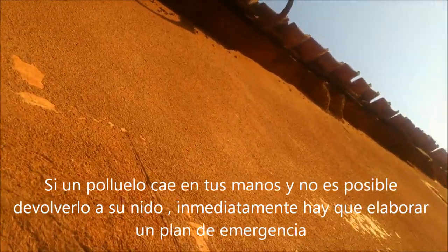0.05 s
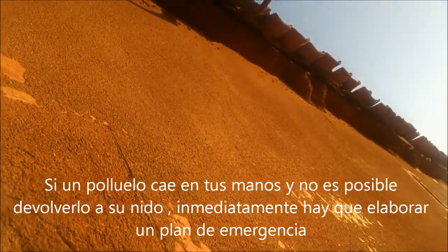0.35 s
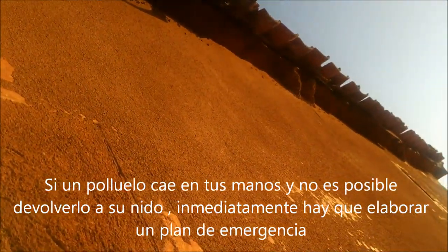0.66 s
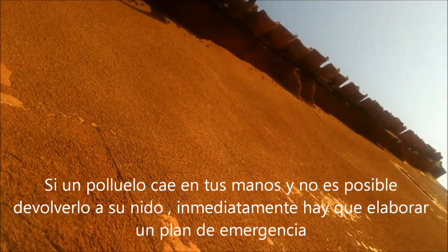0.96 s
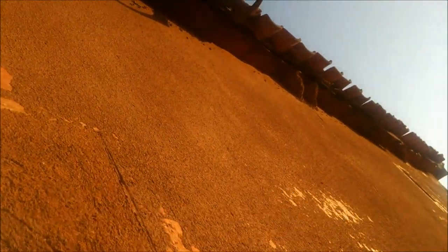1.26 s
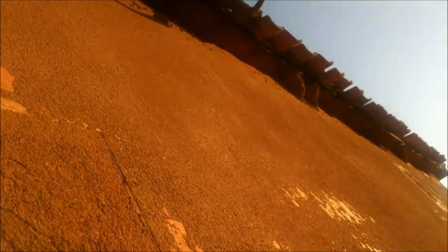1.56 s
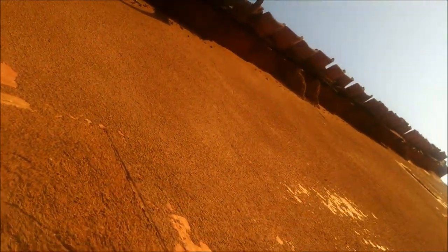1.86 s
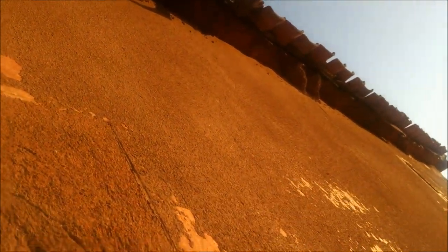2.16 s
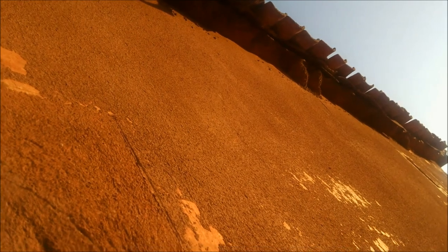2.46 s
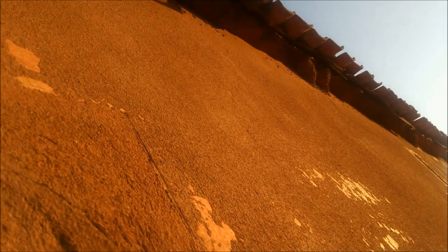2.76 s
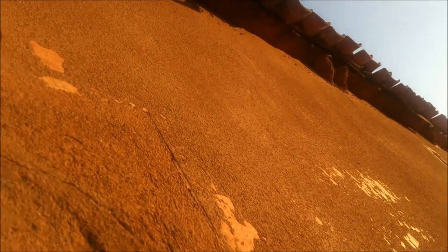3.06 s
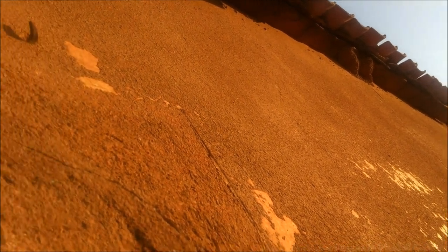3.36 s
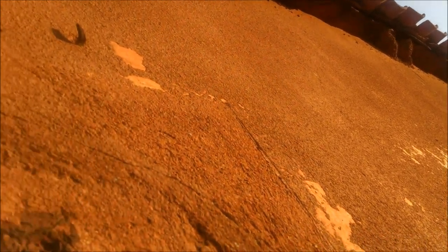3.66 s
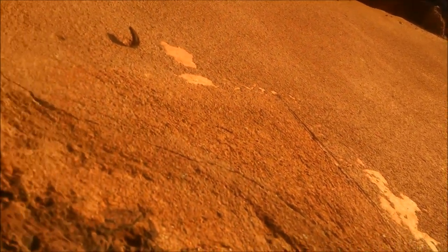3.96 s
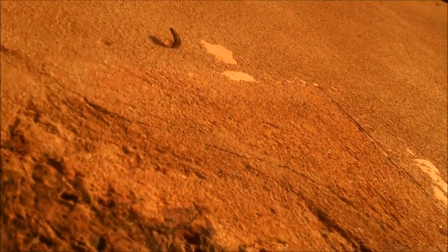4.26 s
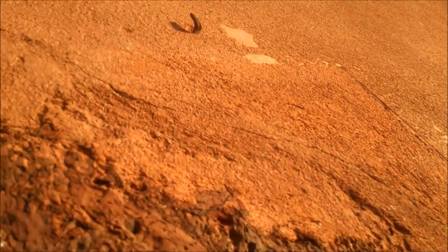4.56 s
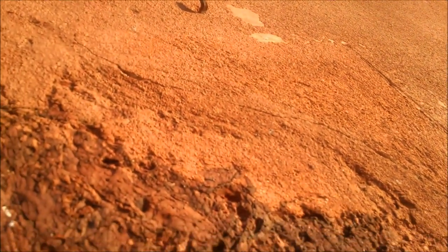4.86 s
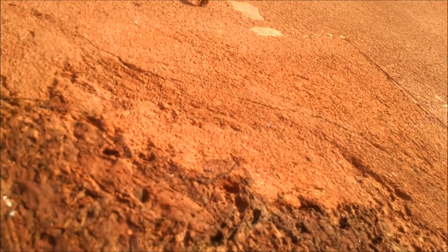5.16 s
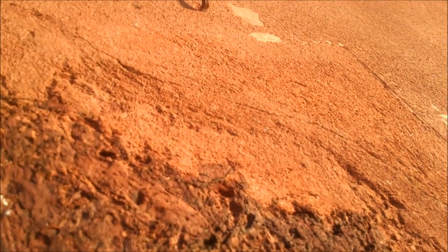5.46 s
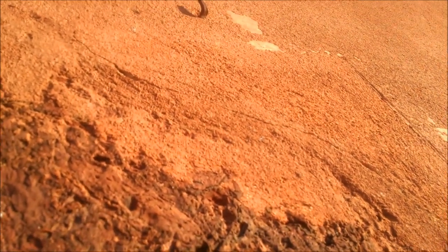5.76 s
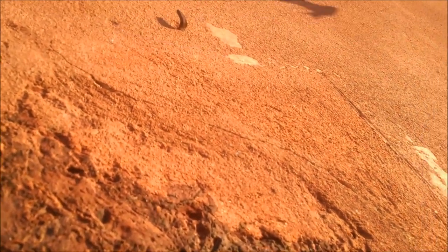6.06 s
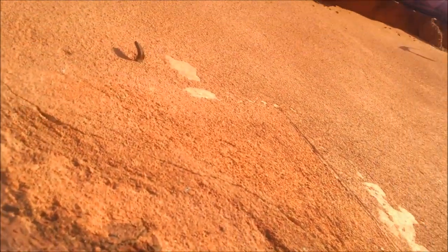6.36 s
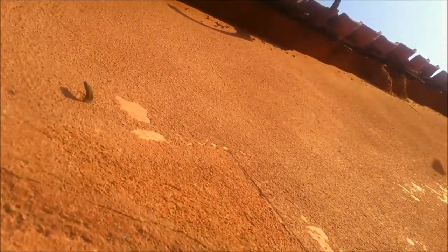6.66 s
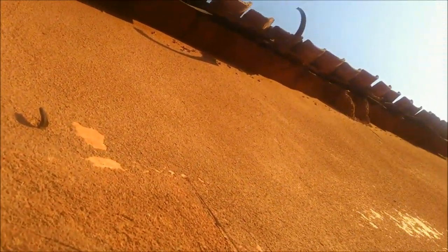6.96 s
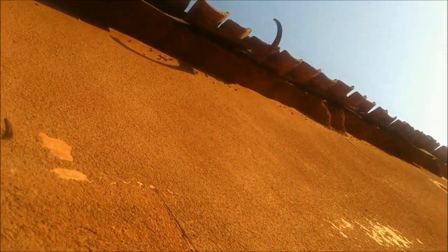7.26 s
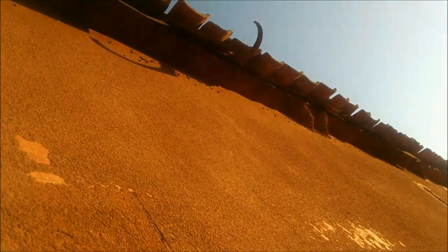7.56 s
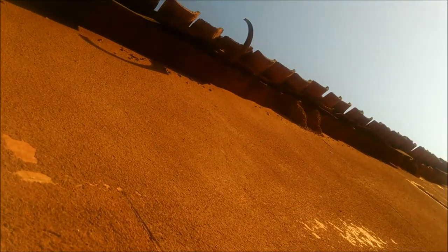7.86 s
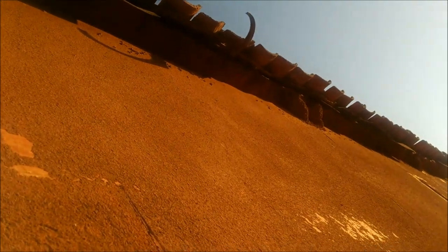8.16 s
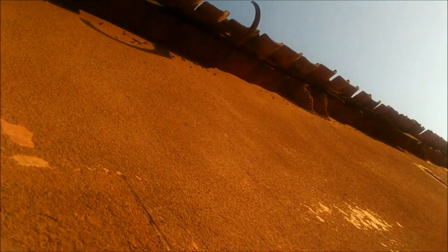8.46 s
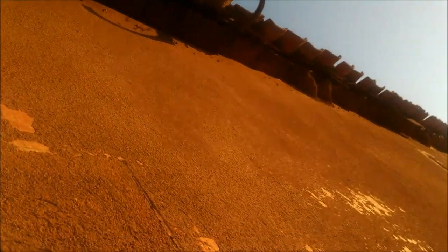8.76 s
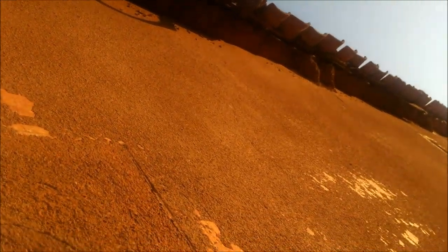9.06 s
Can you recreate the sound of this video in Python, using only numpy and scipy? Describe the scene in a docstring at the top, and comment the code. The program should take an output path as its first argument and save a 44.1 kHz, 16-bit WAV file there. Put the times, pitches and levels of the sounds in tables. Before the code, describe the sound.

Small birds chatter outdoors, close to the microphone at a nest under house eaves. Quick, high two-part chirps open the first half second, followed by short whistles and ticks, while other birds twitter and answer from down an echoing street over a faint low rumble of air. From about 2.3 to 3.5 seconds a far motor, barely audible, whines upward. A dry nasal stutter comes at 3 seconds, then rasping churrs from 3.5 to 4.8 and quick trills around 5. From about 5.4 seconds a busy warble of nasal notes and sharp ticks runs on, with louder answers from the street. At 7.5 seconds the chatter cuts off abruptly. A much quieter place remains until the end, just after 9 seconds, with soft still air and a few faint, blurred chirps in the distance, slightly to the left.

```python
"""Under the eaves of a plastered house wall, the microphone close to a nest of house martins. Each bird's
syrinx glides and shakes in pitch, its throat picking the overtones: two-part chirps, a stutter, rasping churrs,
trills and a warble with ticks. Others answer from down the echoing street, where a far motor whines upward.
Then the scene changes abruptly to a much quieter place with a few distant chirps."""
import sys
import numpy as np
from scipy import signal
from scipy.fft import rfft, irfft, next_fast_len
from scipy.io import wavfile
from scipy.ndimage import uniform_filter1d, minimum_filter1d

SR = 44100
rng = np.random.default_rng(int(sys.argv[2]) if len(sys.argv) > 2 else 0)


def dump(signal):
    """Clip the signal to [-1, 1] and save it as 16-bit WAV at the path in sys.argv[1]."""
    limited = np.clip(np.atleast_2d(signal).T, -1, 1)
    pcm = np.round(limited * 32767).astype(np.int16)
    wavfile.write(sys.argv[1], SR, pcm)


N = 411453
TIME = np.arange(N) / SR
CHATTER_END_S, TOP_HZ = 7.475, 15500

# Ways a note can bend. Each entry: a name, then four pitches from start to end as shares of its pitch.
BENDS = {"arch": (.66, .93, 0.98, .72), "sweep": (0.51, .93, 0.99, 0.96), "rise": (.86, .92, 1.06, 1.22),
         "dip": (1.5, .96, .95, 1.3), "fall": (1.1, 1.06, .93, .82), "level": (.96, 1.01, 1.0, .99)}
# Faint hiss behind both places. Each row: frequency in Hz, relative level in dB.
HISS_SPECTRUM = [(900, 1), (3000, 2.5), (7000, -2), (12500, -0.5), (15500, -10.5)]


def close_birds():
    """All the calls from the nest; so small a bird radiates little that is low."""
    calls = chirp_pairs() + churrs() + trills() + stutter() + warble()
    return signal.sosfilt(signal.butter(4, 1150, "high", fs=SR, output="sos"), calls)


def chirp_pairs():
    """A rough arch is answered at once by a slightly louder, purer upsweep."""
    # Each row: start, delay of the upsweep and syllable length in seconds, relative level in dB.
    pairs = [(0.055, .023, .018, -17.5), (0.143, 0.027, .014, -15), (0.228, 0.025, .014, -13),
             (0.39, 0.023, 0.011, -9), (1.836, .021, .012, -17.5), (3.403, 0.025, .02, -14.5)]
    arch_hz, sweep_hz = (2507, 2890, 3720, 4643, 2900), (2720, 4280, 4850, 4900, 4530)
    out = np.zeros(N)
    for s, gap, length, db in pairs:
        arch = harsh_syllable(length, arch_hz, overtone_db=-6, rasp=.93, flutter_hz=290)
        sweep = harsh_syllable(length, sweep_hz, overtone_db=-12.5, rasp=.58, flutter_hz=310)
        add(out, s, from_db(db) * arch)
        add(out, s + gap, from_db(db + 1) * sweep)
    return out


def churrs(flick_s=.008):
    """A growl, then syllables that dwell low and end in a high flick; flicks grow as the lows fade."""
    # Each row: start and growl length in seconds, syllables, period in seconds, relative level in dB.
    calls = [(3.520, .023, 3, 0.029, -12.5), (3.710, 0.03, 4, 0.023, -15), (3.877, 0.045, 3, .026, -15.5),
             (4.087, 0.032, 1, 0.035, -16), (4.403, 0.04, 3, 0.026, -15), (4.578, 0.027, 3, .026, -15),
             (4.76, 0.013, 2, .023, -23.5)]
    growl_hz, body_hz, flick_hz = (2650, 2790, 2570), (2570, 2646, 3100), (3700, 5040, 5500)
    out = np.zeros(N)
    for s, growl_s, syllables, period, db in calls:
        growl = harsh_syllable(growl_s, growl_hz, overtone_db=-6.5, rasp=1, flutter_hz=233)
        add(out, s, from_db(db - 5) * growl)
        body_s = .72 * period - flick_s / 2
        for k, along in enumerate(np.linspace(0, 1, syllables)):
            start = s + growl_s + k * period
            arched_db = db - 2 * (2 * along - 1) ** 2
            body = harsh_syllable(body_s, body_hz, overtone_db=-3, rasp=.94, flutter_hz=190)
            flick = harsh_syllable(flick_s, flick_hz, overtone_db=-11.5, rasp=.92, flutter_hz=240)
            add(out, start, from_db(arched_db - 6 * along ** 2) * body)
            add(out, start + body_s - flick_s / 2, from_db(arched_db - 6 + 7 * along) * flick)
    return out


def trills(hook_s=.015, sweep_s=.0105, fade_db=-1.4):
    """One hooked syllable, then cleaner upsweeps that end on an even beat and fade one after another."""
    # Each row: start in seconds, syllables, period in seconds, relative level in dB.
    calls = [(4.917, 5, 0.021, -14.5), (5.091, 5, .022, -11), (5.33, 4, .023, -22.5)]
    hook_hz, sweep_hz = (2484, 2490, 3640, 4800), (2600, 4830, 5095, 5580)
    out = np.zeros(N)
    for s, syllables, period, db in calls:
        hook = harsh_syllable(hook_s, hook_hz, overtone_db=-3, rasp=1, flutter_hz=280)
        add(out, s, from_db(db - 2) * hook)
        for k in range(1, syllables):
            sweep = harsh_syllable(sweep_s, sweep_hz, overtone_db=-14, rasp=.68, flutter_hz=270)
            add(out, s + hook_s - sweep_s + k * period, from_db(db + k * fade_db) * sweep)
    return out


def stutter(note_s=.0095, grace_s=.008, lead_s=.0115, bend=(1.1, 1.03, .97, .99)):
    """A dry nasal note over and over, each time with a softer grace note before it."""
    # Each row: start in seconds, relative level in dB, pitch in Hz.
    notes = [(2.9695, -18.5, 1444), (3.0110, -15, 1487), (3.0550, -15, 1460), (3.0990, -14, 1530),
             (3.1460, -13.5, 1638), (3.2105, -13, 1532)]
    out = np.zeros(N)
    for s, db, hz in notes:
        pitches = hz * np.array(bend)
        for start, length, level_db in (s - lead_s, grace_s, db - 6), (s, note_s, db):
            note = syllable(length, pitches, overtone_db=-5, rasp=.39, flutter_hz=450,
                            swell=.7, waver=.25)
            add(out, start, from_db(level_db) * note)
    return out


def warble(tick_s=.0037):
    """The running song: bent whistles, nasal notes rich in overtones, and notes clipped to ticks."""
    # Each row: start and length in seconds, relative level in dB, pitch in Hz, bend.
    whistles = [(0.0, .010, -16.5, 4900, "sweep"), (0.1, 0.014, -24, 4600, "level"),
                (0.261, 0.0091, -21.5, 4050, "arch"), (0.283, 0.019, -20, 4220, "arch"),
                (0.304, 0.013, -23, 3420, "arch"), (0.504, 0.013, -15.5, 3930, "dip"),
                (0.7547, 0.029, -22, 2846, "level"), (0.773, 0.025, -28, 2316, "dip"),
                (0.882, 0.011, -25, 3010, "rise"), (0.909, .008, -24, 2790, "fall"),
                (1.123, 0.034, -25, 3150, "rise"), (1.188, .017, -22.5, 3560, "rise"),
                (1.210, 0.0109, -21, 3110, "dip"), (1.945, 0.024, -17.5, 3493, "arch"),
                (2.077, 0.054, -34.5, 2015, "level"), (2.15, 0.01, -14, 3060, "level"),
                (2.193, 0.038, -28.5, 2586, "dip"), (2.252, 0.076, -26.5, 2950, "level"),
                (2.307, 0.072, -25, 3003, "level"), (2.415, 0.052, -24, 3060, "rise"),
                (2.513, 0.032, -23, 2955, "level"), (5.237, 0.0073, -12.5, 3360, "sweep"),
                (5.243, .024, -24, 3770, "level"), (5.620, 0.041, -28, 1513, "dip"),
                (5.67, 0.023, -32.5, 1907, "dip"), (5.73, 0.061, -29.5, 1865, "dip"),
                (5.769, 0.029, -26, 1412, "arch"), (6.033, .03, -27.5, 1460, "dip"),
                (6.075, .031, -28, 1560, "rise"), (6.147, 0.034, -25.5, 1950, "rise"),
                (6.348, 0.026, -28.5, 2050, "fall"), (6.671, 0.04, -31.5, 1980, "arch"),
                (6.807, 0.027, -31.5, 1156, "dip"), (6.858, 0.018, -28, 1294, "dip"),
                (6.956, 0.072, -31, 1115, "dip"), (7.090, 0.06, -19, 2644, "sweep"),
                (7.115, 0.04, -22, 3050, "level"), (7.295, 0.035, -29.5, 1510, "dip"),
                (7.339, 0.017, -22.5, 1943, "dip"), (7.355, 0.018, -25, 2690, "level")]
    # Low whistles are reedy, high ones nearly pure. Each row: pitch in Hz, dB per overtone.
    purity = [(1200, -9), (2000, -15.5), (3000, -22)]
    # Each row: start and length in seconds, relative level in dB, pitch in Hz.
    nasal_notes = [(0.217, 0.017, -26, 1490), (0.355, 0.012, -30, 1620), (0.47, .023, -25, 1700),
                   (0.522, 0.018, -26, 1458), (0.687, .019, -24.5, 1623), (0.844, 0.0036, -20, 1430),
                   (1.111, 0.0062, -25, 2620), (1.831, 0.011, -24, 2170), (2.082, 0.057, -30.5, 1003),
                   (5.489, 0.064, -27, 1366), (5.858, 0.0061, -13, 1725), (6.184, .044, -27, 1030),
                   (6.2755, .008, -18.5, 1783), (6.439, 0.013, -19.5, 1616), (6.605, 0.017, -23, 1607),
                   (6.77, .011, -15.5, 1632), (7.228, 0.0043, -14.5, 1823)]
    # Each row: start in seconds, relative level in dB, pitch in Hz.
    ticks = [(0.9358, -23, 3500), (0.9544, -13, 3720), (1.911, -15.5, 2680), (1.9311, -10.5, 3080),
             (2.173, -11, 2970), (2.4808, -17.5, 2710), (2.497, -10, 3040), (5.4244, -14, 2710),
             (5.445, -8.5, 2720), (5.5514, -14.5, 5170), (5.6, -14.5, 2520), (5.6192, -11, 2670),
             (5.6526, -14.5, 2790), (5.7753, -15, 2760), (5.8375, -15.5, 3570), (5.9621, -13.5, 4060),
             (6.0298, -13, 2780), (6.143, -19, 3490), (6.2597, -13.5, 3710), (6.322, -19, 3880),
             (6.3359, -11, 2630), (6.6174, -20.5, 3000), (6.6516, -15.5, 3320), (6.7505, -12.5, 4670),
             (6.873, -12, 3530), (6.926, -14, 3540), (6.9439, -10.5, 2630), (7.0824, -16, 2150),
             (7.209, -13.5, 3680), (7.2715, -6, 3570), (7.2898, -12.5, 3040), (7.3214, -15.5, 2670)]
    # Pitch from start to end, as shares of the note's pitch.
    nasal_bend = (.92, 1.01, 1.02, .93)
    tick_bend = (0.934, 1.035)
    out = np.zeros(N)
    for s, length, db, hz, bend in whistles:
        rasp = np.interp(length, [.015, .05], [.6, .25])  # brief notes are rough, held ones clear
        pitches = hz * np.array(BENDS[bend])
        whistle = syllable(length, pitches, at_hz(purity, hz), rasp, flutter_hz=219, waver=.06)
        add(out, s, from_db(db + 1) * whistle)
    for s, length, db, hz in nasal_notes:
        note = syllable(length, hz * np.array(nasal_bend), overtone_db=-4.5, rasp=.58,
                        flutter_hz=300, swell=.22, waver=.14)
        add(out, s, from_db(db - .5) * note)
    for s, db, hz in ticks:
        tick = syllable(tick_s, hz * np.array(tick_bend), overtone_db=-17, rasp=.57,
                        flutter_hz=400, swell=.96, waver=.1)
        add(out, s, from_db(db - 1) * tick)
    return out


def harsh_syllable(length, pitches, overtone_db, rasp, flutter_hz):
    """The second side of the syrinx joins higher up; no two syllables have quite the same pitch."""
    pitches = np.array(pitches) * (1 + .03 * rng.standard_normal(len(pitches)))
    first = syllable(length, pitches, overtone_db, rasp, flutter_hz, swell=.39, waver=.09)
    second = syllable(length, np.minimum(1.3 * pitches, 5500), overtone_db, rasp, flutter_hz)
    return first + from_db(-11) * rasp ** 2 * second


def syllable(length, pitches, overtone_db, rasp, flutter_hz, swell=.45, waver=.125):
    """The syrinx glides through a few pitches; in a rasp its pitch and strength shake rapidly."""
    # What throat and beak let through. Each row: frequency in Hz, gain in dB.
    throat = [(900, -45.5), (1500, -13.5), (2100, 2), (2900, 9.5), (5200, 5), (6500, -4.5), (7700, -14),
              (9000, -32.5), (14000, -37)]
    count = int(np.clip(length * SR, 16, 7000))
    along = np.linspace(0, 1, count)
    contour = np.polyfit(np.linspace(0, 1, len(pitches)), pitches, len(pitches) - 1)
    shake = rms_one(band(rng.standard_normal((2, 8000)), flutter_hz / 3, flutter_hz))
    pitch_shake, strength_shake = shake[:, 1000:1000 + count]
    hz = np.maximum(np.polyval(contour, along) * (1 + waver * rasp * np.tanh(pitch_shake)), 800)
    # the voice breaks into uneven beats
    beat_phase = 2 * np.pi * (rng.random() + np.cumsum(flutter_hz * (1 + .5 * strength_shake)) / SR)
    strength = (1 + min(rasp, .65) * np.sin(beat_phase)) * from_db(3 * rasp * strength_shake)
    harmonic = np.arange(1, 8)[:, None]
    weights = from_db(at_hz(throat, harmonic * hz) + (harmonic - 1) * overtone_db)
    weights *= harmonic * hz < TOP_HZ
    weights /= np.sqrt(np.sum(weights ** 2, axis=0)) + 1e-9
    tone = np.sum(weights * np.sin(harmonic * 2 * np.pi * np.cumsum(hz) / SR), axis=0)
    edges = signal.windows.tukey(count, min(90 / count, 1))  # about a millisecond to start and stop
    voice = tone * rms_one(strength) * edges * np.sin(np.pi * along).clip(0) ** swell
    low_cut = signal.butter(4, .8 * min(pitches), "high", fs=SR, output="sos")
    return signal.sosfilt(low_cut, np.pad(voice, (0, 100)))


def far_birds(calls, overtone_db):
    """Calls far from the microphone: distance leaves little more than the fundamental."""
    out = np.zeros(N)
    for s, length, db, rasp, hz, bend in calls:
        call = syllable(length, hz * np.array(BENDS[bend]), overtone_db, rasp, flutter_hz=281.3, waver=.17)
        add(out, s, from_db(db) * call)
    return out


def colony(calls_per_s=40, centre_hz=3350):
    """Many far birds twitter at random, blurred by the street into a wash."""
    # Each row: time in seconds, relative level in dB.
    levels = [(0.0, -30), (1.78, -38), (2.22, -27.5), (3.46, -42.5), (3.71, -32.5), (4.46, -41),
              (5.13, -31.5), (7.2, -32), (7.45, -49)]
    # Each row: frequency in Hz, relative level in dB.
    wash_spectrum = [(900, -37.5), (1300, -15.5), (1900, -6), (2900, -2), (4200, -3.5), (5200, -9),
                     (7000, -21.5), (9000, -49.5)]
    draws = rng.random((int(calls_per_s * CHATTER_END_S), 5))
    calls = []
    for i, (when, length, loud, tune, shape) in enumerate(draws):
        hz = centre_hz * 1.5 ** (tune - .5)
        bend = list(BENDS)[int(shape * len(BENDS))]
        calls.append(((i + when) / calls_per_s, .015 + .05 * length, 5 * loud, .6, hz, bend))
    voices = rms_one(street_echoes(far_birds(calls, overtone_db=-16), t60=.12))
    wash = from_db(-8) * air_noise(wash_spectrum)
    return from_db(-7) * gain_curve(levels) * (.8 * voices + wash)


def street_echoes(x, t60, echoes_per_s=1500, width=.12):
    """Scattered echoes between house fronts, dulled in the treble and dying away over t60 seconds."""
    t = np.arange(SR) / SR
    arrivals = rng.standard_normal((2, SR)) * (rng.random((2, SR)) < echoes_per_s / SR) * (t > .008)
    arrivals *= from_db(-60 * t / t60)
    tails = band(arrivals, 1000, 4800) / np.sqrt(np.sum(arrivals ** 2, axis=1, keepdims=True))
    mid, side = signal.fftconvolve(x[None], tails, axes=1)[:, :N]
    return mid + width * side * [[1], [-1]]


def motor():
    """A far motor speeds up: a faint whine with its octave, ragged at first and steadying as it rises."""
    # Each row: time in seconds, pitch in Hz, levels of fundamental and octave in dB.
    run_up = [(2.33, 520, -64, -68), (2.70, 612, -73, -65), (2.82, 669, -64.5, -68),
              (3.03, 722, -57.5, -75), (3.17, 803, -61.5, -81), (3.39, 900, -64.5, -85),
              (3.47, 905, -83, -100)]
    hz, fundamental_db, octave_db = in_time(run_up)
    waver = np.interp(TIME, [2.4, 2.8], [.09, .012]) * rms_one(band(rng.standard_normal(N), 13, 80))
    phase = 2 * np.pi * np.cumsum(hz * (1 + waver)) / SR
    running = (TIME > run_up[0][0]) & (TIME < run_up[-1][0])
    whine = from_db(fundamental_db) * np.sin(phase) + from_db(octave_db) * np.sin(2 * phase)
    return running * np.sqrt(2) * whine


def street_air():
    """Outdoor air by the wall: a low, drifting rumble and a steady hiss."""
    # Each row: time in seconds, level in dB.
    rumble_levels = [(0, -61.5), (0.9, -66.5), (3.0, -62), (4.2, -66), (7.4, -64)]
    # Each row: frequency in Hz, relative level in dB.
    rumble_spectrum = [(15, -39), (25, -1), (102, -8.5), (130, -10.5), (300, -17), (329, -18), (361, -16.5),
                       (818, -23), (1000, -30.5), (1300, -62), (2200, -120)]
    rumble = gain_curve(rumble_levels) * air_noise(rumble_spectrum)
    return rumble + from_db(-66) * air_noise(HISS_SPECTRUM)


def mains_hum():
    """A faint, pure hum at 100 Hz."""
    # Each row: time in seconds, level in dB.
    levels = [(0, -69.5), (2.9, -69), (3.7, -78.5), (7.4, -76)]
    return gain_curve(levels) * np.sin(2 * np.pi * 100 * TIME)


def still_air():
    """Barely audible air and hiss, with soft swells of a low rush."""
    # Each row: time in seconds, level in dB.
    rush_levels = [(7.47, -69), (7.8, -66.5), (8.0, -70), (8.25, -81), (8.6, -72.5), (8.9, -70), (9.3, -80)]
    # Each row of both: frequency in Hz, relative level in dB.
    rush_spectrum = [(150, -19), (300, -1), (440, 0.5), (750, -8.5), (1350, -6), (1900, -17.5),
                     (2700, -24.5)]
    air_spectrum = [(15, -30), (25, -10), (44, -3), (80, -4), (99, -10), (214, -14), (278, -31), (451, -9),
                    (534, -25), (1470, -24), (2620, -34), (3580, -21.5), (7940, -31.5), (10300, -58),
                    (17500, -120)]
    rush = gain_curve(rush_levels) * air_noise(rush_spectrum)
    return rush + from_db(-72.5) * air_noise(air_spectrum) + from_db(-77.5) * air_noise(HISS_SPECTRUM)


def air_noise(spectrum):
    """Stereo noise of a given colour at rms 1, wide in the bass and narrower higher up."""
    # Each row: frequency in Hz, likeness of left and right from 0 to 1.
    likeness = [(40, 0.1), (250, 0.1), (900, 0.8), (2000, 1), (5000, 0.6), (10000, 0.78)]
    size = next_fast_len(N) * 2
    hz = np.maximum(np.fft.rfftfreq(size, 1 / SR), 1)
    gain = from_db(at_hz(spectrum, hz)) * (hz > 20)
    alike = at_hz(likeness, hz)
    mid, side = rfft(rng.standard_normal((2, size)))
    stereo = np.sqrt(1 + alike) * mid + np.sqrt(1 - alike) * side * [[1], [-1]]
    return rms_one(irfft(gain * stereo)[:, :N])


def from_db(db):
    return 10 ** (np.asarray(db) / 20)


def rms_one(x):
    return x / np.sqrt(np.mean(x ** 2) + 1e-20)


def in_time(rows):
    """Each column of a curve at every sample."""
    s, *columns = np.transpose(rows)
    return [np.interp(TIME, s, column) for column in columns]


def gain_curve(levels):
    return from_db(in_time(levels)[0])


def at_hz(points, hz):
    """A spectrum read on a log-frequency axis."""
    known_hz, values = np.transpose(points)
    return np.interp(np.log(hz), np.log(known_hz), values)


def band(x, low_hz, high_hz):
    return signal.sosfilt(signal.butter(2, [low_hz, high_hz], "band", fs=SR, output="sos"), x)


def delayed(x, delay_s):
    return np.interp(TIME - delay_s, TIME, x, left=0)


def add(track, s, sound):
    """Lay a sound into a track at s seconds."""
    start = max(round(s * SR), 0)
    track[start:start + len(sound)] += sound[:N - start]


def by_the_wall():
    """The nest close up, with echoes from eaves and wall; the street and the colony lie beyond."""
    # Birds down the street. Each row: start and length in seconds, relative level in dB,
    # rasp from 0 to 1, pitch in Hz, bend.
    answers = [(0.419, 0.054, -21.5, .4, 4100, "level"), (0.460, .081, -22, .9, 3500, "fall"),
               (0.517, .13, -25.5, .5, 3194, "level"), (1.152, 0.03, -25, .05, 3880, "level"),
               (1.271, 0.023, -30, .05, 3040, "dip"), (1.337, 0.074, -34, .8, 3580, "sweep"),
               (1.462, 0.064, -30.5, .5, 3850, "rise"), (1.601, 0.07, -31, .5, 3460, "rise"),
               (1.698, 0.014, -25, .2, 4350, "arch"), (2.686, 0.079, -29.5, .45, 3126, "level"),
               (2.823, 0.1, -30.5, .4, 3070, "level"), (3.428, 0.041, -23.5, .7, 4380, "fall"),
               (3.811, .071, -28, .2, 4760, "level"), (4.863, 0.033, -30.5, .3, 4800, "arch"),
               (5.183, 0.043, -26, .1, 4100, "fall"), (5.224, 0.075, -20.5, .9, 3500, "level"),
               (5.314, 0.068, -20, .9, 3287, "level"), (5.900, 0.065, -18.5, .2, 4125, "sweep"),
               (5.945, 0.073, -24, .1, 3550, "fall"), (6.414, 0.049, -19, .8, 3915, "arch"),
               (6.477, 0.053, -15, .8, 3610, "level"), (6.552, 0.078, -19, .9, 3383, "level")]
    close, far = close_birds(), far_birds(answers, overtone_db=-19)
    direct = close + from_db(-2.5) * far
    reflections = from_db(-17.5) * delayed(close, .0022) + from_db(-14) * delayed(close, .0052)
    eaves = from_db(-18) * street_echoes(close, t60=.052, width=.6)
    street = from_db(-15) * street_echoes(close, t60=.16) + from_db(-5.5) * street_echoes(far, t60=.52)
    return direct + reflections + eaves + street + colony() + street_air() + mains_hum() + motor()


def in_the_quiet():
    """Blurred distant chirps in still air, a little to the left of the microphone."""
    # Each row: start and length in seconds, relative level in dB, rasp from 0 to 1, pitch in Hz, bend.
    chirps = [(7.603, 0.076, -61.5, .6, 3600, "fall"), (8.539, 0.077, -63.5, .6, 3640, "fall"),
              (8.645, 0.12, -60.5, 0.7, 4070, "level"), (8.793, 0.097, -58.5, 0.95, 3910, "level"),
              (8.937, .09, -66, 0.95, 3920, "level"), (9.088, 0.077, -68, 0.77, 3850, "sweep")]
    birds = far_birds(chirps, overtone_db=-20)
    direct = from_db(-1.5) * np.array([birds, delayed(birds, .00027)])
    return direct + still_air() + from_db(-7) * street_echoes(birds, t60=.61, width=.98)


def scene(crossfade_s=.014):
    """The scene changes abruptly from the chatter by the wall to the quiet place."""
    chatter = np.clip((CHATTER_END_S - TIME) / crossfade_s + .5, 0, 1)
    return chatter * by_the_wall() + (1 - chatter) * in_the_quiet()


def record(dry, ceiling=.38, headroom=1.05):
    """A fast limiter holds down the loudest chirps, their peaks are slightly rounded; the top is cut."""
    allowed = np.minimum(1, ceiling / (np.abs(dry).max(axis=0) + 1e-9))
    gain = uniform_filter1d(minimum_filter1d(allowed, size=45), size=45)
    rounded = headroom * np.tanh(dry * gain / headroom)
    return signal.sosfilt(signal.cheby2(12, 60, TOP_HZ + 700, fs=SR, output="sos"), rounded)


dry = scene()
out = record(dry)
dump(out)
```